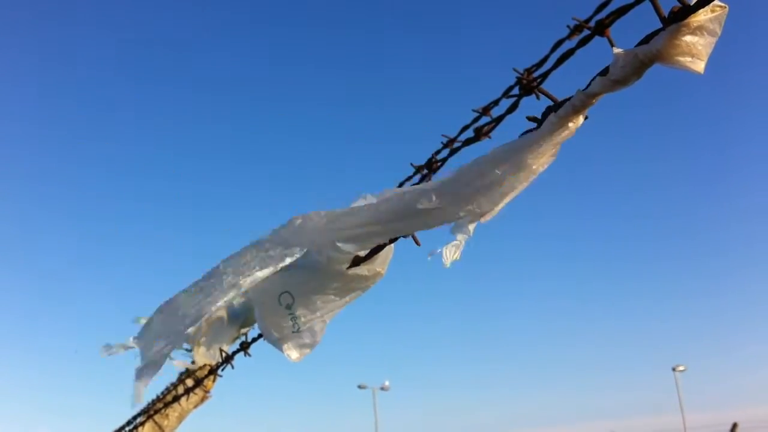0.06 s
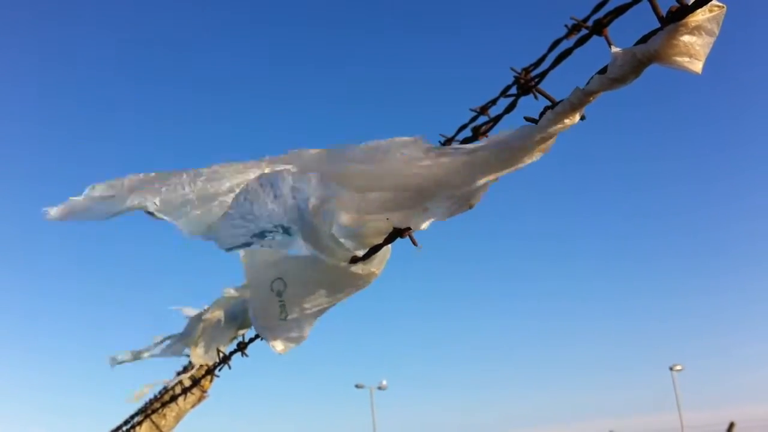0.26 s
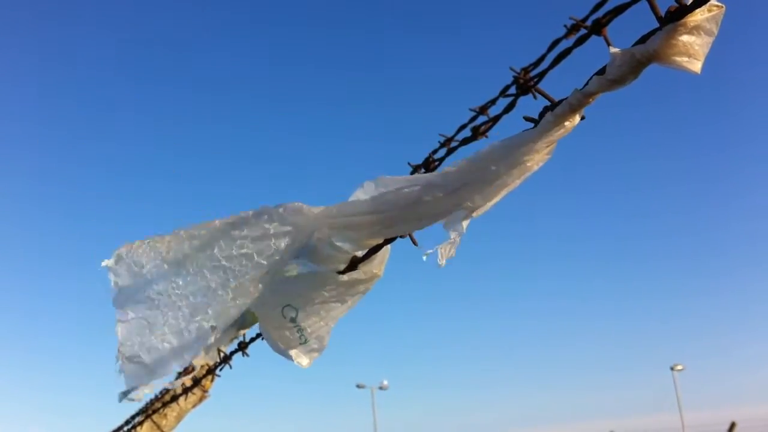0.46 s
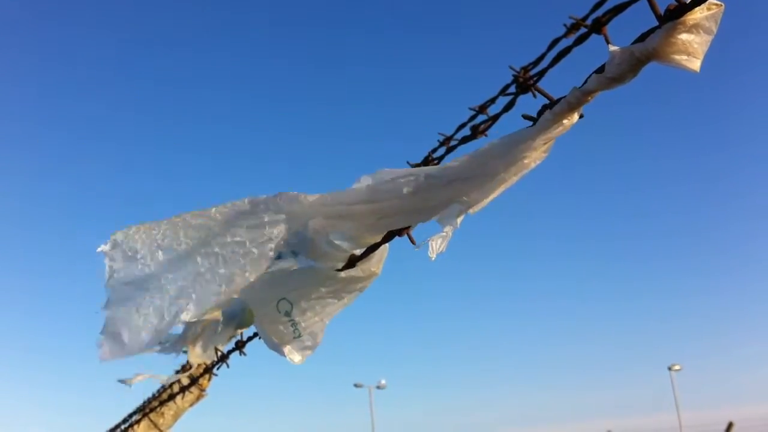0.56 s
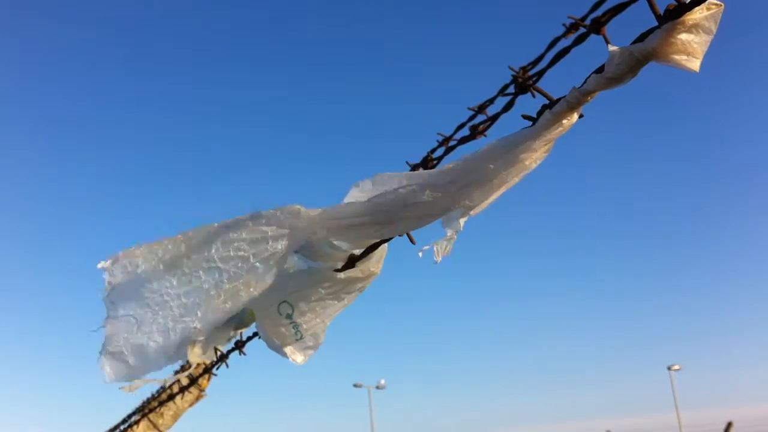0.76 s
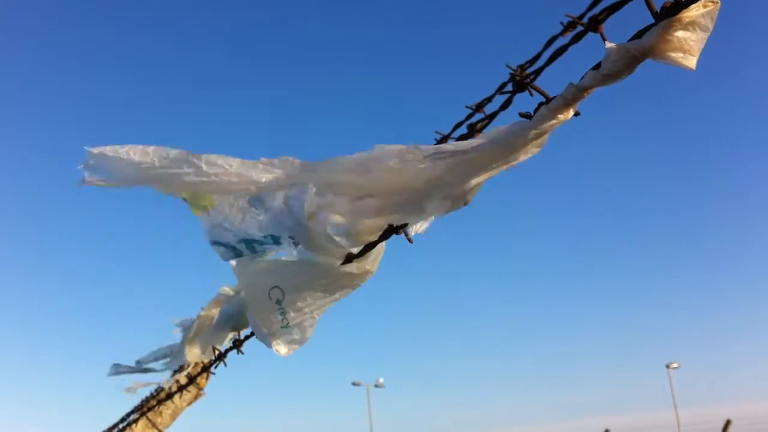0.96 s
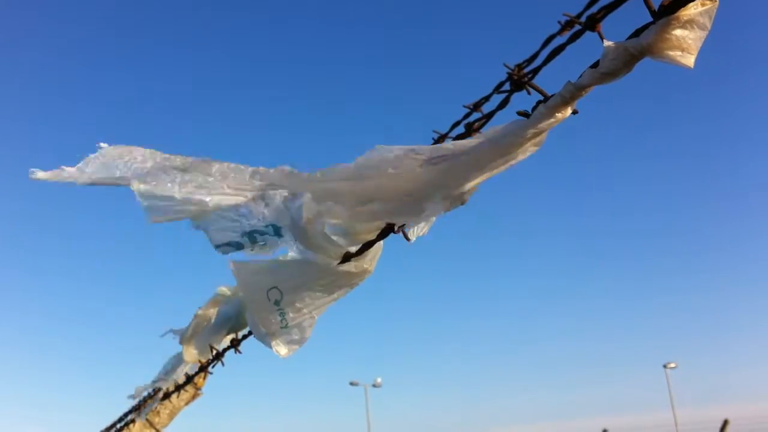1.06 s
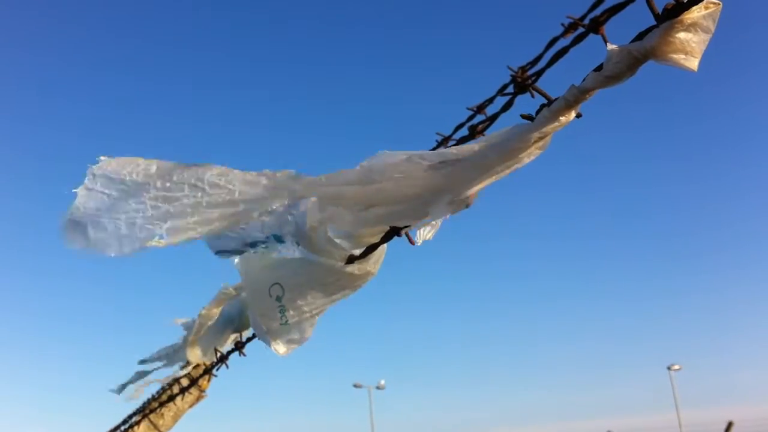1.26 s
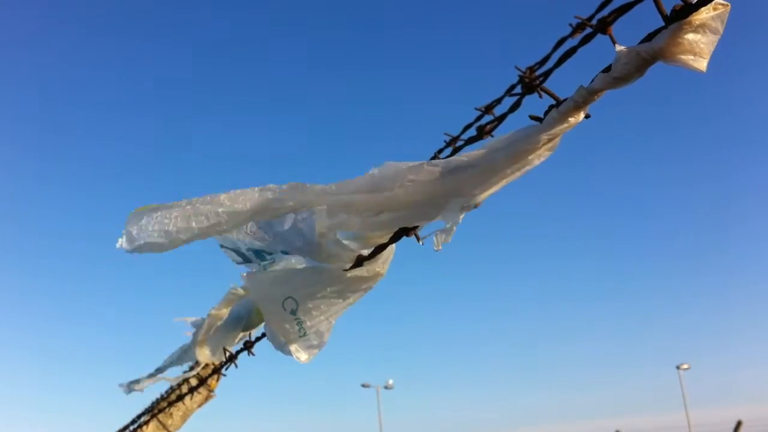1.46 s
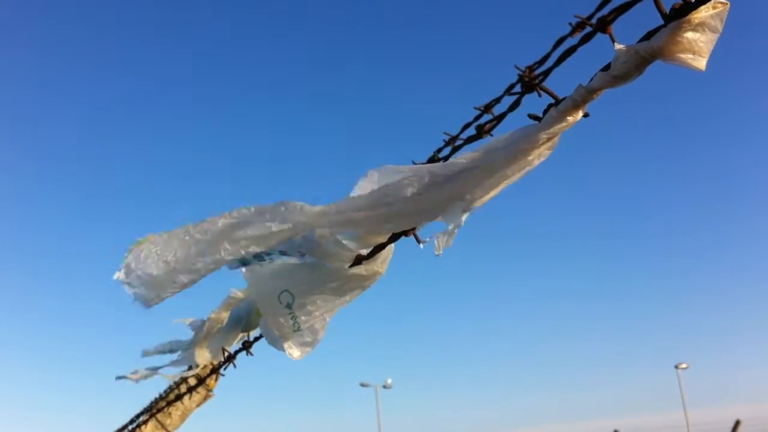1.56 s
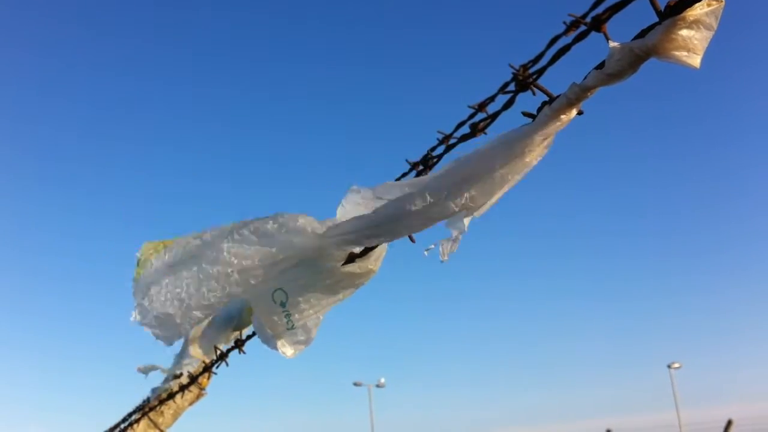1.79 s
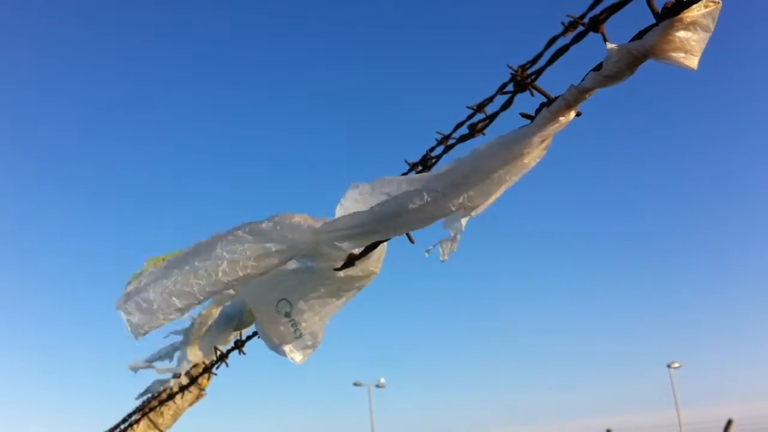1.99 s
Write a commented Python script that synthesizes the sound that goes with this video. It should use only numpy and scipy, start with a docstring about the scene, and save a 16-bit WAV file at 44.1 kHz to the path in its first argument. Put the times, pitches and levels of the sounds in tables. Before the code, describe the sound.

Gusty wind buffets the microphone in dull thumps, calms mid-way, then hits hardest near the end

```python
"""Gusty wind at a wire fence on which a torn plastic bag flutters.
From the start, eddies hit the microphone as short dull thumps over a lumpy, filtered-noise rumble.
The wires hum, strongest in the middle, as wavering tones; the bag crackles faintly in clicks and snaps.
Later a small bird twitters far off in gliding tones, and the hardest gust comes near the end.
A distant drone and hiss, both coloured noise, lie under it all."""
import sys
import numpy as np
from scipy import signal
from scipy.fft import rfft, irfft
from scipy.io import wavfile
from scipy.ndimage import uniform_filter1d

SR = 44100
rng = np.random.default_rng(int(sys.argv[2]) if len(sys.argv) > 2 else 0)


def waveform_to_disk(signal):
    """Save audio, clipped to [-1, 1], as 16-bit WAV at the path in sys.argv[1]."""
    frames = np.transpose(np.atleast_2d(signal))
    scaled = np.clip(frames, -1, 1) * 32767
    samples = np.round(scaled).astype(np.int16)
    wavfile.write(sys.argv[1], SR, samples)


N = 89655   # length in samples, about 2 s

WIND_FILTER_HZ = 135   # low cut of the microphone, applied to the eddies


def from_db(db):
    """Turn decibels into a gain."""
    return 10 ** (np.asarray(db) / 20)


def rms_one(x):
    """Scale a signal to rms 1."""
    return x / np.sqrt(np.mean(x ** 2) + 1e-20)


def in_time(rows):
    """Join (time, value) rows by straight lines."""
    return np.interp(np.arange(N) / SR, *np.transpose(rows))


def bell(s, length):
    """Smooth swell centred on s; length is the spread of the bell curve in seconds."""
    distance_in_lengths = (np.arange(N) / SR - s) / length
    return np.exp(-.5 * np.minimum(distance_in_lengths ** 2, 100))


def butter(x, hz, kind, order=2):
    """Butterworth filter that runs forward in time."""
    safe_hz = np.clip(hz, 10, .48 * SR)
    return signal.sosfilt(signal.butter(order, safe_hz, kind, fs=SR, output="sos"), x)


def colour(x, spectrum):
    """Shape a signal by (frequency, level) points, fading outside them; rms 1."""
    hz, db = np.transpose(spectrum)
    f = np.maximum(np.fft.rfftfreq(N, 1 / SR), 1)
    gain = from_db(np.interp(np.log(f), np.log(hz), db))
    gain = gain * np.minimum(1, f / hz[0]) * np.minimum(1, hz[-1] / f) ** 2
    return rms_one(irfft(rfft(x) * gain, N))


def noise(spectrum):
    """Coloured noise of rms 1."""
    return colour(rng.standard_normal(N), spectrum)


def even_noise(spectrum):
    """Coloured noise with its slow chance swells ironed out."""
    x = noise(spectrum)
    window = int(.014 * SR)   # swings slower than about 14 ms are evened out
    power = uniform_filter1d(uniform_filter1d(x ** 2, window), window)
    return rms_one(x / np.sqrt(np.abs(power) + 1e-9))


def drift(rate):
    """Random wander of rms 1, mostly slower than rate in Hz."""
    f = np.fft.rfftfreq(N, 1 / SR)
    return rms_one(irfft(rfft(rng.standard_normal(N)) / (1 + (f / rate) ** 4), N))


def tone(hz):
    """Sine of rms 1 that follows a pitch curve."""
    return np.sqrt(2) * np.sin(2 * np.pi * (np.cumsum(hz) / SR + rng.random()))


def buffets():
    """Each eddy is one lopsided pressure pulse in a short wake; the low cut turns it into a thump."""
    # eddies that hit the microphone: t/s, peak level/dB, sharpness f/Hz
    eddies = [(.027, -26.5, 170), (0.068, -29, 200), (.097, -27.5, 240), (0.112, -30, 200),
              (.123, -25, 330), (0.176, -25, 237), (0.202, -22.5, 176), (0.2296, -28.5, 435),
              (.277, -35.5, 175), (.317, -28, 230), (0.339, -27.5, 490), (0.36, -23.5, 210),
              (.381, -26.5, 170), (0.4412, -24.5, 570), (.446, -19, 243), (0.4574, -20.5, 333),
              (.469, -36, 230), (.512, -29, 210), (0.557, -29.5, 300), (0.575, -26.5, 280),
              (.734, -33, 173), (0.823, -31, 180), (.897, -25, 198), (0.91, -26.5, 413),
              (1.176, -26.5, 260), (1.340, -26.5, 170), (1.365, -26.5, 240), (1.4038, -25, 310),
              (1.527, -18.5, 190), (1.546, -23, 220), (1.5535, -18, 335), (1.5813, -13.5, 220),
              (1.590, -17.5, 230), (1.5942, -22.5, 420), (1.6256, -19, 320), (1.638, -25.5, 270),
              (1.654, -19, 240), (1.6682, -20, 320), (1.672, -20, 732), (1.688, -4, 550), (1.695, -22, 230),
              (1.7032, -11.5, 530), (1.716, -12, 595), (1.7234, -12.5, 252), (1.7307, -17, 947),
              (1.7344, -11, 352), (1.745, -31, 400), (1.7522, -16.5, 390), (1.7619, -18, 523),
              (1.7765, -19.5, 676), (1.847, -30.5, 279), (1.874, -26.5, 220), (1.91, -18.5, 160),
              (1.9227, -23.5, 480), (1.942, -20.5, 613), (1.9471, -14, 222), (1.9538, -16.5, 634),
              (1.967, -13.5, 290), (1.9734, -12.5, 200), (1.99, -19, 190), (2.0026, -17.5, 443)]
    rise_periods, fall_over_rise = 0.16, 1.37   # rise time in periods of the sharpness
    low_share, high_times = 0.66, 1.6   # band of the eddy as multiples of its sharpness
    wake_db, wake_s, wake_bright = -22, .0035, 1.773   # level, length, cut-off over sharpness
    out, t = np.zeros(N), np.arange(N) / SR
    for s, db, hz in eddies:
        u = np.clip((t - s) * hz / rise_periods, -60, 60)
        pulse = 1 / (np.exp(-u) + np.exp(u / fall_over_rise))
        pulse = butter(pulse, hz * low_share, "high")
        thump = butter(pulse, hz * high_times, "low", order=3)
        thump = butter(thump, WIND_FILTER_HZ, "high", order=3)
        # move the deepest dip to the listed moment and set the peak to 1
        thump = np.roll(thump, int(s * SR) - np.argmin(thump)) / np.abs(thump).max()
        churning = rms_one(butter(rng.standard_normal(N), hz * wake_bright, "low", order=5))
        wake = butter(churning * bell(s, wake_s), WIND_FILTER_HZ, "high", order=4)
        out += from_db(db) * (thump + from_db(wake_db) * wake)
    return out


def turbulence():
    """Lumpy rumble follows the gust; a brighter churning grows faster and shows only in hard wind."""
    # strength of the wind at the microphone: t/s, level/dB
    gust = [(0, -33.5), (.12, -38), (.16, -40.5), (.25, -37), (.35, -34.5), (.41, -39.5), (.57, -41),
            (.63, -44), (.73, -42), (.86, -48), (.91, -45), (.97, -52.5), (1.12, -54.5), (1.18, -54),
            (1.26, -52), (1.37, -36), (1.49, -44), (1.55, -34.5), (1.65, -29), (1.695, -22.5), (1.76, -26),
            (1.8, -40.5), (1.83, -45.5), (1.89, -39), (1.96, -25.5), (2.03, -40)]
    # spectrum of the rumble: f/Hz, relative level/dB
    rumble_spectrum = [(30, -47.5), (60, -36.5), (100, -11), (155, 5), (220, -0.5), (350, -10.5),
                       (500, -23), (750, -28.5), (1200, -45), (2500, -84.5)]
    # spectrum of the churning: f/Hz, relative level/dB
    churn_spectrum = [(150, -18.5), (300, 7.5), (560, -4.5), (750, -15.5), (1000, -26), (1400, -46),
                      (2200, -52.5), (4000, -55.5)]
    rumble_db = -2   # relative to the gust
    lumpy_db, lumps_hz = 2.0, 78   # depth and speed of the lumps
    churn_db, churn_from_db = -25.5, -24.5   # churning level at this gust strength
    churn_growth = 2.4   # dB of churning per dB of gust
    gust_db = in_time(gust)
    lumps = rms_one(from_db(lumpy_db * drift(lumps_hz)))
    rumble = from_db(gust_db + rumble_db) * even_noise(rumble_spectrum)
    churn_level_db = churn_db + churn_growth * (gust_db - churn_from_db)
    churn = from_db(churn_level_db) * even_noise(churn_spectrum)
    return lumps * (rumble + churn)


def throbs():
    """For a few cycles at a time, vortices leave the microphone's edge in step."""
    # air throbs across the microphone: t/s, length/s, pitch f/Hz, level/dB
    throb_rows = [(0.038, 0.032, 169.4, -38), (0.123, 0.018, 177.8, -34.5), (0.111, 0.033, 235.1, -37.5),
                  (0.337, 0.014, 150, -28), (0.377, 0.014, 168, -34.5), (1.37, 0.016, 160.3, -39),
                  (1.586, 0.005, 152.2, -22), (1.687, 0.0027, 573.4, -15), (1.713, 0.031, 152.3, -24),
                  (1.726, 0.0042, 256, -16.5), (1.925, 0.0086, 145, -37.5)]
    waver_hz = 9
    out = np.zeros(N)
    for s, length, hz, db in throb_rows:
        out += from_db(db) * bell(s, length) * tone(hz + waver_hz * drift(30))
    return out


def wires():
    """Vortices shed by the fence wires make a hum of unsteady level and pitch."""
    # loudness of the hum: t/s, level/dB
    hum_level = [(0, -62), (.48, -67), (.57, -43), (.63, -58), (.72, -66.5), (.82, -45), (.88, -58.5),
                 (.94, -39), (.975, -55), (1.01, -48), (1.09, -53.5), (1.16, -39), (1.21, -63.5),
                 (1.339, -50.5), (1.469, -46), (1.6, -59)]
    # pitch of the hum: t/s, f/Hz
    hum_pitch = [(.7, 348), (.82, 362), (.94, 348), (1.02, 362), (1.18, 364), (1.35, 350), (1.5, 320)]
    waver_hz, flicker_db = 19.45, -0.5   # spread of the random wander; the sign makes no difference
    level_db = in_time(hum_level) + flicker_db * drift(25)
    return from_db(level_db) * tone(in_time(hum_pitch) + waver_hz * drift(35.3))


def bag():
    """Flutters let tiny random crinkles through, and now and then a crease snaps as a short tone."""
    # the sheet flutters: t/s, length/s, level/dB
    flutters = [(.14, 0.092, -80), (1.05, 0.036, -72.5), (1.272, .025, -82), (1.622, 0.037, -77),
                (1.83, 0.051, -74), (1.95, 0.057, -75)]
    # spectrum of the crinkles: f/Hz, relative level/dB
    crinkle_spectrum = [(3000, -23), (6500, -2), (9000, -7.5), (12500, -7), (15500, -4)]
    # creases of the bag snap: t/s, peak level/dB, f/Hz
    snap_rows = [(.126, -65, 13000), (.3435, -54, 5460), (.560, -70, 11500), (1.035, -65, 11000),
                 (1.065, -64, 11500), (1.276, -64, 13500), (1.321, -67, 12500), (1.596, -59.5, 7200),
                 (1.599, -58.5, 13000), (1.818, -65, 12500), (1.925, -64, 13500)]
    crinkles_per_s = 790
    snap_s, snap_scatter = 0.0011, 0.066   # length; pitch scatter as a share of the pitch
    clicks = (rng.random(N) < crinkles_per_s / SR) * rng.standard_normal(N)
    flutter = sum(from_db(db) * bell(s, length) for s, length, db in flutters)
    crinkles = colour(clicks, crinkle_spectrum) * flutter
    snaps = np.zeros(N)
    for s, db, hz in snap_rows:
        ring = tone(hz * (1 + snap_scatter * drift(1500))) / np.sqrt(2)   # peak 1
        snaps += from_db(db) * bell(s, snap_s) * ring
    return crinkles + snaps


def bird():
    """Thin, wavering glides from far away, blurred by scattered echoes."""
    # bird notes: t/s, length/s, start f/Hz, middle f/Hz, end f/Hz, level/dB
    chirps = [(1.411, .065, 5500, 4900, 4800, -66.5), (1.527, 0.076, 4550, 4560, 4913, -72.5),
              (1.636, .04, 4640, 4210, 4280, -73), (1.713, .07, 5310, 4710, 5020, -69.5),
              (1.84, 0.022, 4400, 4710, 5000, -73)]
    waver_hz, echo_db, echo_s = 99, -4, 0.035   # pitch waver; echo level and decay time
    out, t = np.zeros(N), np.arange(N) / SR
    for s, length, first, middle, last, db in chirps:
        u = np.clip((t - s) / length, 0, 1)   # progress through the note
        hz = np.interp(u, [0, .5, 1], [first, middle, last]) + waver_hz * drift(250)
        swell = np.sqrt(np.abs(np.sin(np.pi * u)) / 2)
        out += from_db(db) * swell * tone(hz)
    echo = rng.standard_normal(N) * np.exp(-t / echo_s)
    echo = echo / np.sqrt(np.sum(echo ** 2))
    return out + from_db(echo_db) * signal.fftconvolve(out, echo)[:N]


def distance():
    """A low drone, as of far traffic, swells and sinks under a steady open-air hiss."""
    # spectrum of the drone: f/Hz, relative level/dB
    drone_spectrum = [(60, -40), (150, -6), (200, -6.5), (280, -10), (350, 0.5), (420, -3), (500, -6),
                      (620, -19.5), (1000, -29.5)]
    # loudness of the drone: t/s, level/dB
    drone_level = [(0, -55.5), (.6, -51.5), (.8, -45), (.94, -46), (1.04, -51), (1.15, -43), (1.27, -50.5),
                   (1.46, -50.5), (1.8, -54), (2.03, -44.5)]
    # spectrum of the hiss: f/Hz, relative level/dB
    air_spectrum = [(30, -18.5), (200, -2), (700, 0), (1000, -0.5), (1300, 0), (1800, -2), (2300, -6.5),
                    (2650, -4.5), (3000, -9), (3400, -13), (3900, -17.5), (5500, -19), (7500, -22.5),
                    (10000, -25.5), (13500, -26), (15800, -25.5)]
    air_db = -57
    drone = from_db(in_time(drone_level)) * noise(drone_spectrum)
    hiss = from_db(air_db) * noise(air_spectrum)
    return drone + hiss


def scene():
    """Wind on the microphone in front of the fence, the bag, the bird and the distance."""
    return (buffets() + turbulence() + throbs() + wires() + bag() + bird() + distance())[None]


def record(dry):
    """Cut the top steeply with an elliptic low-pass."""
    cutoff_hz = 15750
    return signal.sosfilt(signal.ellip(12, .1, 80, cutoff_hz, fs=SR, output="sos"), dry)


dry = scene()
out = record(dry)
waveform_to_disk(out)
```